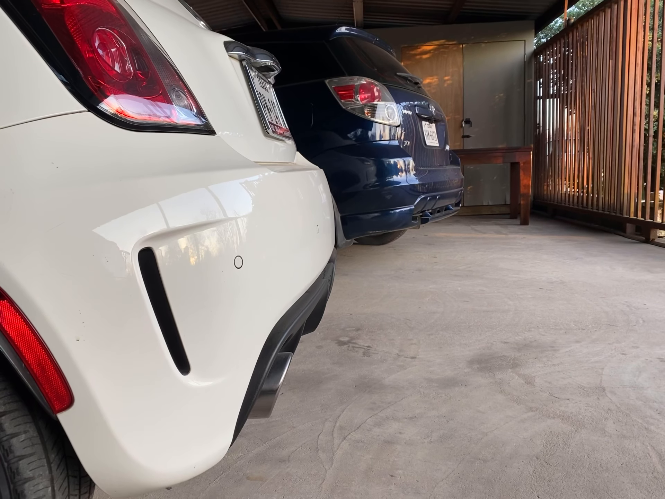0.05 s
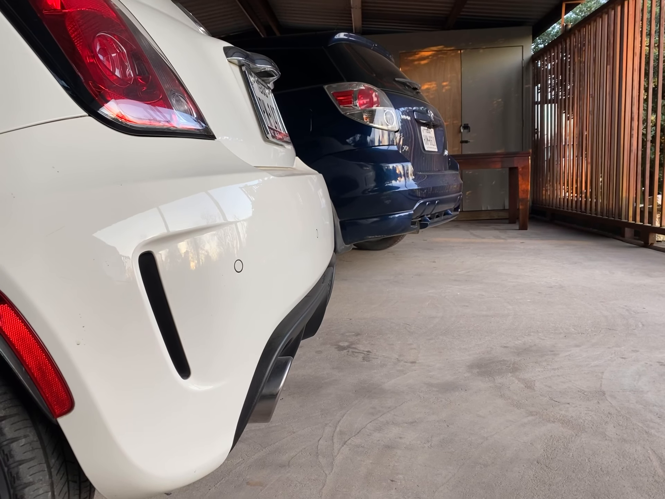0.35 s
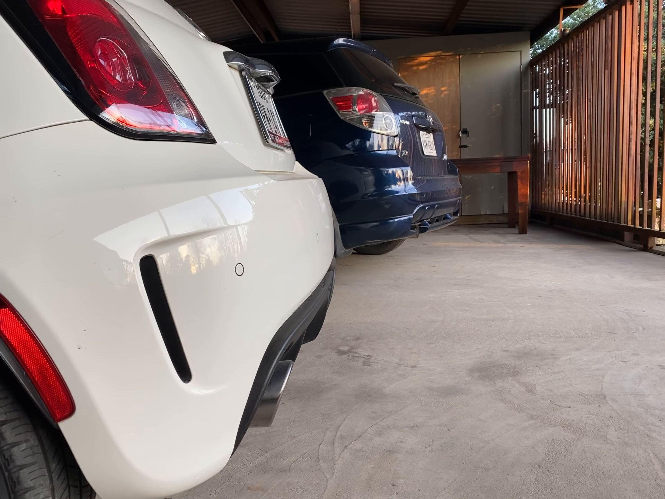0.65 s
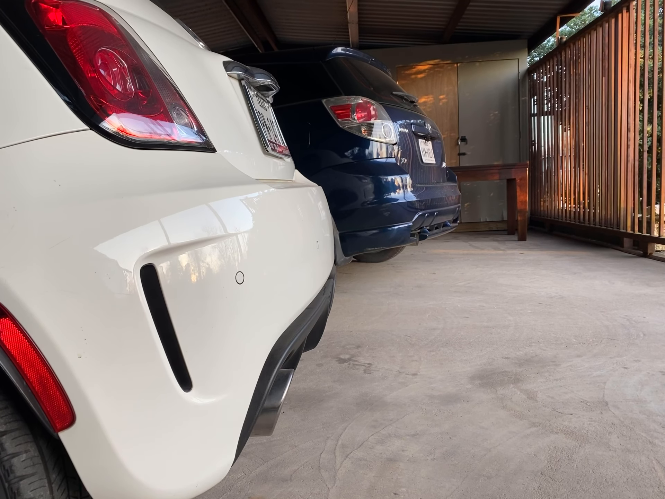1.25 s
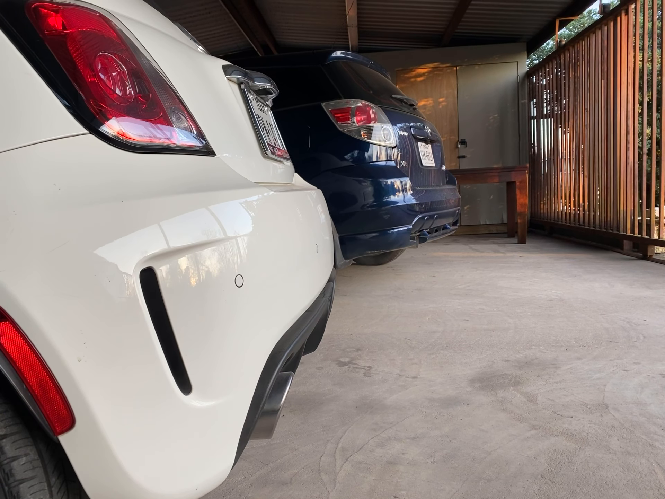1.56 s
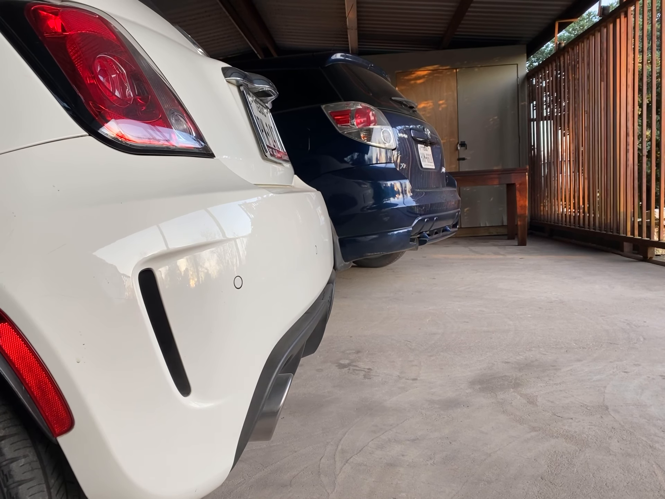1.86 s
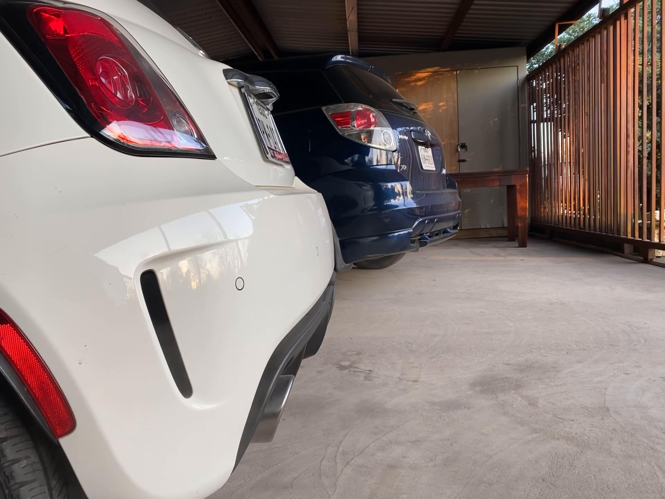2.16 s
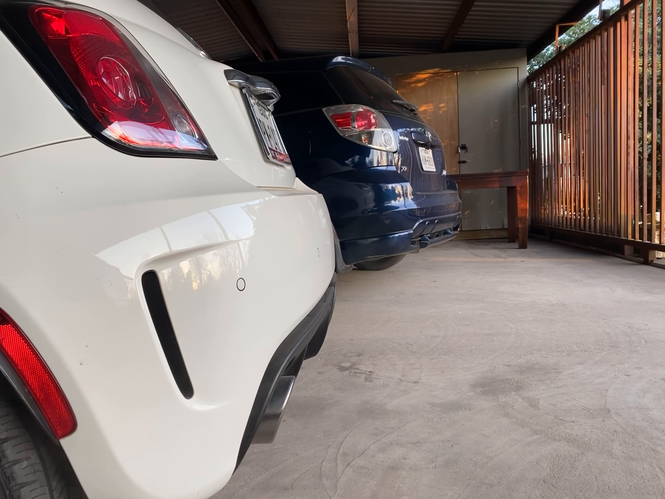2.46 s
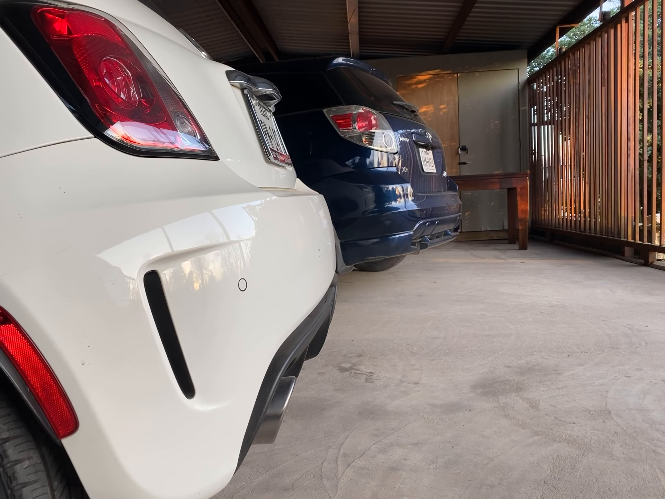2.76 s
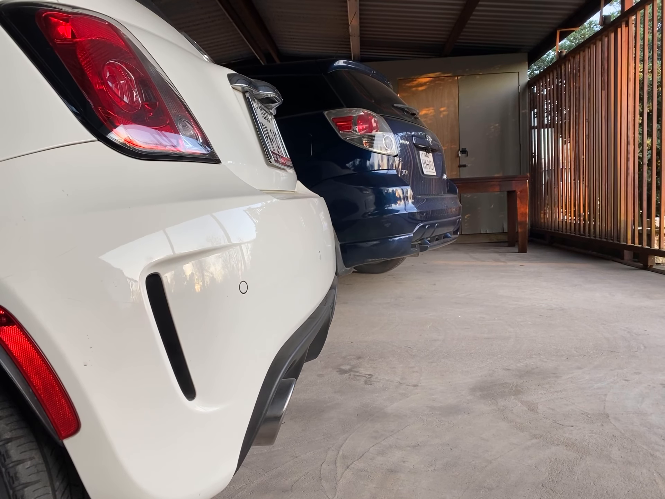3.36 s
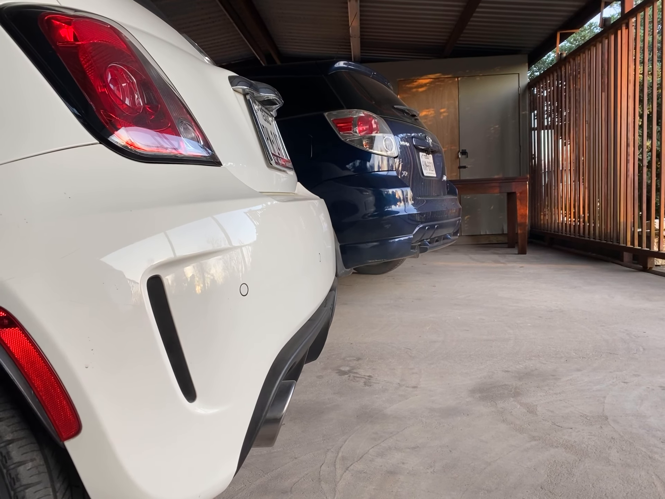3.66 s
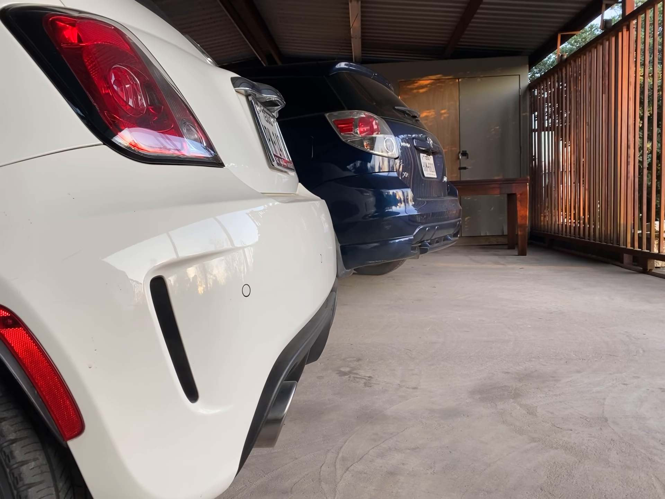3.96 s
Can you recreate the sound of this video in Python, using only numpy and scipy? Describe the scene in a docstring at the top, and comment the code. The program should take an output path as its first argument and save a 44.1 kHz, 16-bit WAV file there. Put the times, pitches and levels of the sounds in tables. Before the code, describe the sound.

A car engine idles steadily under a carport roof, heard from beside the tailpipe. The exhaust throbs and booms with light metallic clatter, while a faint wavering whine and a steady hiss lie behind it.

```python
"""Car idling in a carport

A four-cylinder engine idles under a roof, heard from beside its tailpipe; the speed sags a little.
Every firing sends a pulse down the exhaust, which booms at twice the firing rate, and sets the engine
clattering. A wavering whine, a thin high whistle and a steady hiss lie behind it."""
import sys
import numpy as np
from scipy import signal
from scipy.fft import rfft, irfft, next_fast_len
from scipy.io import wavfile
from scipy.ndimage import uniform_filter1d, minimum_filter1d, map_coordinates

SR = 44100
rng = np.random.default_rng(int(sys.argv[2]) if len(sys.argv) > 2 else 0)


def master_out(mix):
    """Clip the mix to full scale and print it as 16-bit PCM to the path in sys.argv[1]."""
    frames = np.transpose(np.atleast_2d(mix))
    ceiling = np.clip(frames, -1, 1)
    pcm = np.round(ceiling * 32767).astype(np.int16)
    wavfile.write(sys.argv[1], SR, pcm)


N = 176400
CYLINDERS = 4


def amp(db):
    """Decibels to gain."""
    return 10 ** (np.asarray(db) / 20)


def unit(x):
    """Scale to rms 1."""
    return x / np.sqrt(np.mean(x ** 2) + 1e-20)


def eq_gain(points, hz):
    """Gain of an EQ curve drawn through (freq_hz, gain_db) points on a log axis."""
    freq_hz, gain_db = np.transpose(points)
    return amp(np.interp(np.log(hz + 1), np.log(freq_hz + 1), gain_db))


def automation(rows):
    """One per-sample curve for each column after the time."""
    time_s, *columns = np.transpose(rows)
    return [np.interp(np.arange(N) / SR, time_s, column) for column in columns]


def wobble(rate):
    """A smooth random curve with `rate` knots a second."""
    knots = rng.standard_normal(1024)
    coarse = np.arange(0, N + 64, 64)
    return np.interp(np.arange(N), coarse, map_coordinates(knots, [coarse * rate / SR], mode='wrap'))


def filtered(x, response):
    """Pass x through a complex frequency response."""
    size = next_fast_len(N + SR // 2)
    return irfft(rfft(x, size) * response(np.fft.rfftfreq(size, 1 / SR)), size)[:N]


def noise(spectrum):
    """Coloured noise of rms 1."""
    return unit(filtered(rng.standard_normal(N), lambda hz: eq_gain(spectrum, hz)))


def rattle(firings, marks, db, decay_s):
    """A dying burst of noise each time the firing count passes a mark."""
    t = np.arange(N) / SR
    start_s = np.interp(marks, firings, t, left=-1, right=N)
    latest = np.maximum(np.searchsorted(start_s, t) - 1, 0)
    return amp(db)[latest] * np.exp(-np.abs(t - start_s[latest]) / decay_s) * rng.standard_normal(N)


def blows(firings, marks, db, decay_s, jitter_s=.0006):
    """A clean blow at each mark, slightly early or late, with a little rattle after it."""
    hit_s = np.interp(marks, firings, np.arange(N) / SR, left=-1, right=N)
    hit_s += jitter_s * rng.standard_normal(len(marks))
    heard = (hit_s >= 0) & (hit_s < (N - 1) / SR)
    clicks = np.bincount((hit_s[heard] * SR).astype(int), amp(db[heard]), N)
    return unit(clicks) + amp(-2) * unit(rattle(firings, marks, db, decay_s))


def ring(strikes, modes):
    """Struck metal rings at its resonances, muffled by the car's body; rms 1."""
    # EQ of the path out of the engine bay: freq_hz, gain_db
    muffle = [(300, -27), (700, -5), (1000, 1.5), (2200, 2), (2700, -9), (3400, 1), (4200, -14),
              (9000, -22)]

    def resonances(hz):
        return sum((-1) ** k * amp(db) * 1j * hz * width / (pitch ** 2 - hz ** 2 + 1j * hz * width)
                   for k, (pitch, width, db) in enumerate(modes))
    return unit(filtered(strikes, lambda hz: resonances(hz) * eq_gain(muffle, hz)))


def clatter(firings):
    """One knock per firing rings the engine block and the thin metal shields."""
    # Each cylinder's knock after its exhaust pulse: delay_firings, accent_db
    knocks = [(.5, 4.5), (0.502, 3), (0.501, 3.5), (.52, 1.5)]
    # Engine block resonances: pitch_hz, width_hz, relative_db
    block_modes = [(703, 36, -8), (817, 23.2, 2), (955.6, 44, -0.5), (998, 43.4, 0), (1062, 29.3, 1),
                   (1152, 27, -6.5), (1374, 72, -4.5), (1616, 23.3, -9)]
    # Shield resonances: pitch_hz, width_hz, relative_db
    shield_modes = [(1757, 82, -6.5), (2006, 58, -2.5), (2088, 28, -0.5), (2255, 41, -4.5),
                    (3160, 160, -14.5)]
    # Fader on the shields, the clatter's treble: time_s, level_db (before trim)
    shield_fader = [(0.0, -31), (0.03, -40), (0.15, -38.5), (0.88, -40), (0.89, -36), (1.17, -41.5),
                    (1.34, -34.5), (1.74, -38.5), (3.02, -37), (4.0, -40.5)]
    count = np.arange(-4, 200)
    delay, accent_db = np.array(knocks)[count % CYLINDERS].T
    accent_db = accent_db + rng.standard_normal(len(count))
    block = ring(blows(firings, count + delay, accent_db, decay_s=0.0046), block_modes)
    shields = ring(blows(firings, count + delay, accent_db, decay_s=0.0032), shield_modes)
    shield_db, = automation(shield_fader)
    return amp(-27.5) * block + amp(shield_db + 1) * shields


def valves(firings):
    """The valve gear ticks twice per firing."""
    # Valve gear resonances: pitch_hz, width_hz, relative_db
    valve_modes = [(1320, 41, 5), (1442, 17, 7), (1420, 230, 2.5)]
    lifts = np.arange(-8, 400) / 2 + .06
    ticks = rattle(firings, lifts, db=rng.standard_normal(len(lifts)), decay_s=0.0023)
    return amp(-36) * ring(ticks, valve_modes)


def chug(firings, depth_db=4.5, peak_firing=0.061, sharpness=4):
    """One cylinder blows harder: a gain that swells once per engine cycle."""
    cycle_phase = 2 * np.pi * (firings - peak_firing) / CYLINDERS
    return unit(amp(depth_db * np.exp(sharpness * (np.cos(cycle_phase) - 1))))


def exhaust(firings, boom_order=2, drone_orders=(7, 8)):
    """The pipe's partials line up into throbbing pulses; the boom and two drones swell on their own."""
    # Exhaust note, in quarter steps from unequal cylinders: order (times the firing rate), relative_db
    partials = [(0.25, -34.5), (0.5, -38), (0.75, -46.5), (1, -19.5), (1.25, -51), (1.5, -39), (1.75, -30),
                (2, -1), (2.25, -38), (2.5, -32.5), (2.75, -34.5), (3, -15.5), (3.25, -45.5), (3.5, -42),
                (3.75, -32.5), (4, -14.5), (4.25, -33.5), (4.5, -15), (4.75, -26.5), (5, -5.5), (5.25, -19),
                (5.5, -30), (5.75, -42.5), (6, -13), (6.25, -25), (6.5, -25.5), (6.75, -28), (7, 4),
                (7.25, -32.5), (7.5, -20), (7.75, -23), (8, -18.5), (8.25, -54), (8.5, -34.5),
                (8.75, -36.5), (9, -20), (9.25, -35), (9.5, -36), (9.75, -20.5), (10, -20), (10.2, -30),
                (10.5, -33), (10.8, -30.5), (11, -18.5), (11.2, -31.5), (11.5, -53.5), (11.8, -56),
                (12, -34.5), (12.2, -36), (12.5, -33), (12.8, -20.5), (13, -29.5), (13.2, -40), (13.5, -33),
                (13.8, -37), (14, -47.5), (14.2, -33.5), (14.5, -49.5), (14.8, -34), (15, -22),
                (15.2, -33.5), (15.5, -49.5), (15.8, -66), (16, -44), (16.2, -50), (16.5, -40),
                (16.8, -26.5), (17, -45), (17.2, -35.5), (17.5, -44.5), (17.8, -28.5), (18, -39)]
    # Exhaust faders: time_s, boom_db, throb_db (before trim)
    pipe_faders = [(0.05, -18.5, -20), (1.6, -14, -21.5), (2.12, -13, -21.5), (2.29, -14, -20.5),
                   (2.84, -13, -22), (3.01, -13.5, -21.5), (3.83, -11.5, -22.5), (3.9, -11, -23.5)]
    # Swells of two orders sliding across pipe resonances: time_s, seventh_db, eighth_db (before trim)
    drone_faders = [(0.05, -25, -27), (0.12, -23, -37), (0.69, -24, -32), (1.64, -23, -25),
                    (1.98, -26, -22), (2.02, -29, -28), (2.41, -24.5, -23.5), (2.84, -28, -28),
                    (3.06, -26, -25), (3.62, -38, -30), (3.88, -37, -28.5), (3.9, -36, -29.5)]
    partial_db = np.array(partials)[:, 1]
    orders = np.arange(1, len(partial_db)) / CYLINDERS
    # Minimum-phase lags give each pulse a sharp front and a tail.
    log_gain = np.log(amp(np.pad(partial_db, (1, len(partial_db)), mode='edge')))
    lags = np.imag(signal.hilbert(np.r_[log_gain, log_gain[-2:0:-1]]))[1:]
    throb, solo = np.zeros(N), {}
    for order, db, lag in zip(orders, partial_db, lags):
        wave = np.cos(2 * np.pi * order * firings - lag)
        if order == boom_order or order in drone_orders:
            solo[order] = unit(wave)
        else:
            waver_db = 0.275 * order - 0.73  # the top orders are the least steady
            throb += amp(db + waver_db * wobble(8)) * wave
    boom_db, throb_db = automation(pipe_faders)
    boom = amp(boom_db + 1) * solo[boom_order]
    drone = sum(amp(db + 0.5) * solo[order] for order, db in zip(drone_orders, automation(drone_faders)))
    return amp(throb_db + 3) * unit(throb) + boom + drone * chug(firings)


def puffs(firings):
    """Turbulent gas leaves the pipe, strongest at every pulse."""
    # Colour of the gas noise: freq_hz, relative_db
    gas_spectrum = [(20, -24), (40, -35), (65, -9), (100, -6.5), (150, -5), (230, -17.5), (340, 4.5),
                    (400, -11), (480, -1.5), (580, -2.5), (640, -7), (700, -8), (800, -14.5), (1500, -15.5),
                    (1900, -28), (5000, -51)]
    pulsing = 1 + 0.16 * np.cos(2 * np.pi * firings)
    return amp(-28.5) * unit(noise(gas_spectrum) * chug(firings) * pulsing)


def carport(x, t60_s=.2, wet_db=-11):
    """A short diffuse answer from roof and walls."""
    t = np.arange(SR // 2) / SR
    tail = rng.standard_normal(len(t)) * np.exp(-np.log(1000) * t / t60_s)
    return amp(wet_db) * signal.fftconvolve(x, tail / np.linalg.norm(tail))[:N]


def tone(hz, drift_hz, flutter_db, rate):
    """A sine of rms 1, unsteady in level and pitch."""
    flutter = amp(flutter_db * wobble(rate))
    pitch_hz = hz + drift_hz * wobble(rate)
    return unit(flutter * np.sin(2 * np.pi * np.cumsum(pitch_hz) / SR))


def whine(firings):
    """Two close tones, likely from the belt drive, that pulse twice per firing."""
    # Glide of the lower tone: time_s, pitch_hz
    glide = [(0.0, 1338), (0.34, 1317), (0.58, 1333), (1.45, 1297), (1.54, 1320), (2.6, 1303), (2.63, 1334),
             (4.0, 1320)]
    # Fader on the pair: time_s, level_db (before each tone's trim)
    fader = [(0.0, -26), (0.17, -23), (0.33, -36), (0.36, -24.5), (1.5, -31), (2.02, -27), (2.09, -36),
             (2.62, -26), (4.0, -30)]
    pitch_hz, = automation(glide)
    level_db, = automation(fader)
    lower = amp(-5) * tone(pitch_hz, drift_hz=2.9, flutter_db=0.5, rate=26)
    upper = amp(-7) * tone(pitch_hz * 1.076, drift_hz=5.66, flutter_db=2.5, rate=28)
    pulsing = 1 + 0.71 * np.cos(4 * np.pi * (firings - .12))
    return amp(level_db) * (lower + upper) * pulsing


def whistle(pitch_hz=5870):
    """A thin, fluttering whistle with a fainter octave."""
    fundamental = amp(-57) * tone(pitch_hz, drift_hz=24, flutter_db=3.5, rate=150)
    octave = amp(-64) * tone(2 * pitch_hz, drift_hz=20.3, flutter_db=1.5, rate=60)
    return fundamental + octave


def hiss(firings, level_db=-38.5, flutter_db=0.68):
    """A bed of hiss that lifts slightly with every knock."""
    # Colour of the hiss: freq_hz, relative_db
    hiss_spectrum = [(500, 3), (2500, 7), (3300, 2.5), (4000, -2.5), (6100, -1.5), (7300, -4.5), (9000, -9),
                     (11000, -9.5), (12300, -6.5), (13500, -9.5), (14500, -12), (15700, -24)]
    pulsing = 1 + 0.025 * np.cos(2 * np.pi * (firings - .7))
    return amp(level_db + flutter_db * wobble(20)) * pulsing * noise(hiss_spectrum)


def scene():
    """Mono mix: a running count of firings sets the rhythm; only the engine's metal feeds the reverb."""
    # Sagging idle speed: time_s, firing_rate_hz
    idle_speed = [(0.0, 47.3), (0.05, 46.1), (0.3, 46.9), (0.39, 47.8), (0.88, 46.5), (0.99, 46.2),
                  (1.9, 45.5), (1.96, 45.9), (3.09, 45.7), (3.45, 44.5), (3.8, 45.2), (4.0, 44)]
    firing_rate_hz, = automation(idle_speed)
    firings = np.cumsum(firing_rate_hz) / SR - 1.13
    engine = clatter(firings) + valves(firings)
    tailpipe = exhaust(firings) + puffs(firings)
    return (engine + tailpipe + carport(engine) + whine(firings) + whistle() + hiss(firings))[None]


def record(dry, ceiling=.85, smooth_s=.004, top_hz=15700):
    """Master chain: a peak limiter, tiny fades at both ends and a brick-wall high cut."""
    window = int(smooth_s * SR)
    reduction = ceiling / np.maximum(np.abs(dry[0]), ceiling)
    gain = uniform_filter1d(minimum_filter1d(reduction, 2 * window), window)
    fades = signal.windows.tukey(N, window / N)
    return filtered(dry[0] * gain * fades, lambda hz: hz < top_hz)[None]


dry = scene()
out = record(dry)
master_out(out)
```